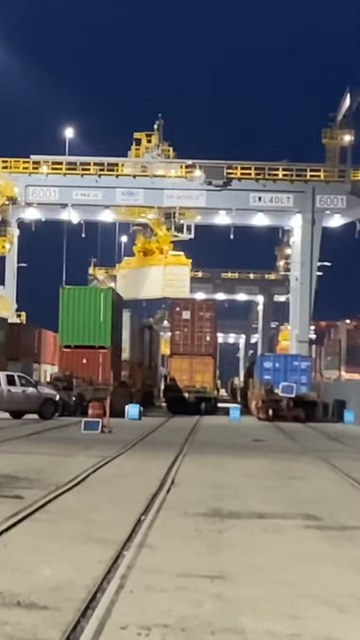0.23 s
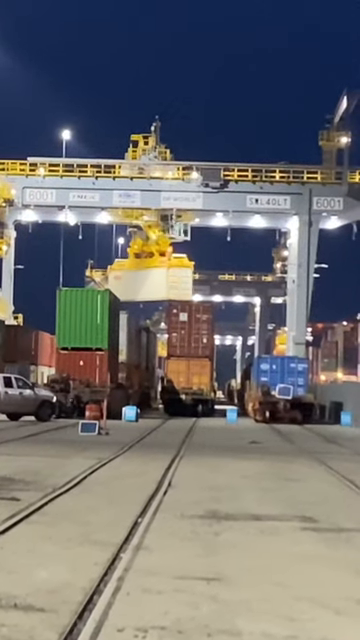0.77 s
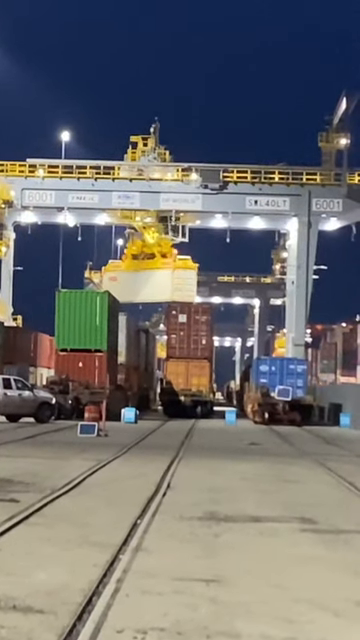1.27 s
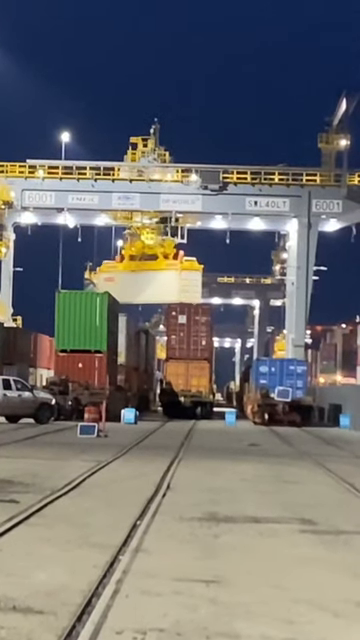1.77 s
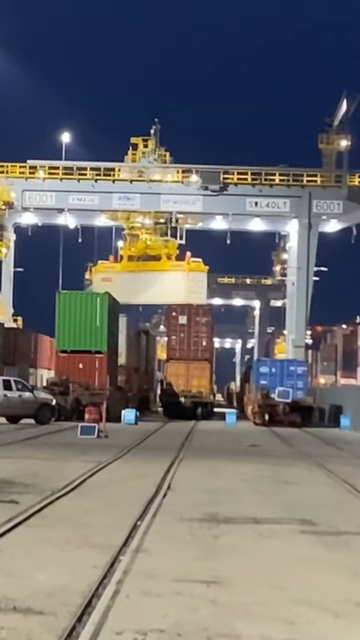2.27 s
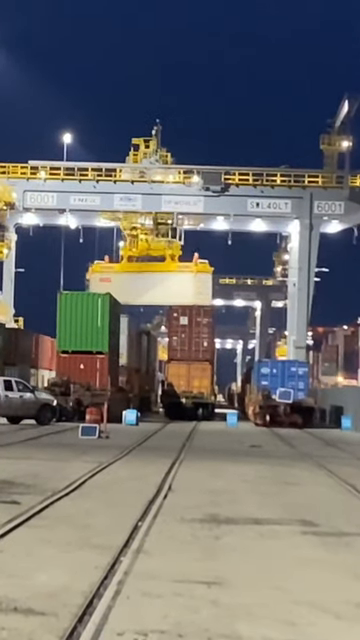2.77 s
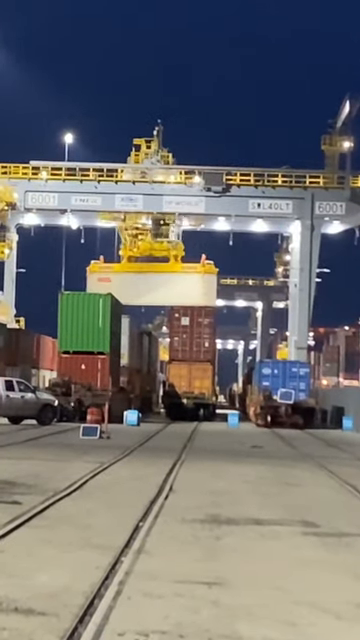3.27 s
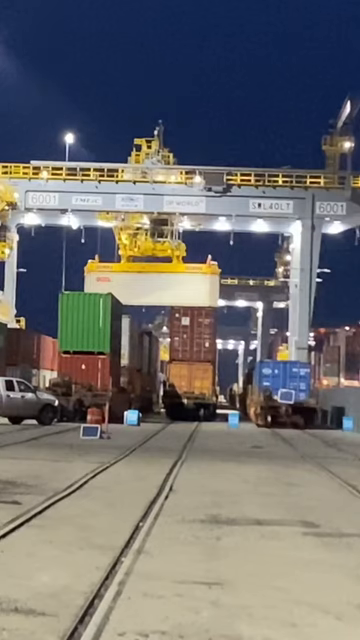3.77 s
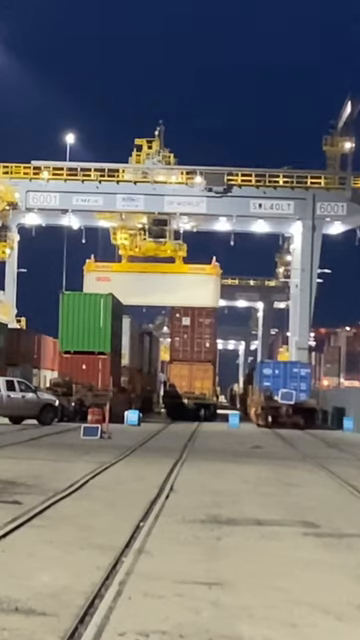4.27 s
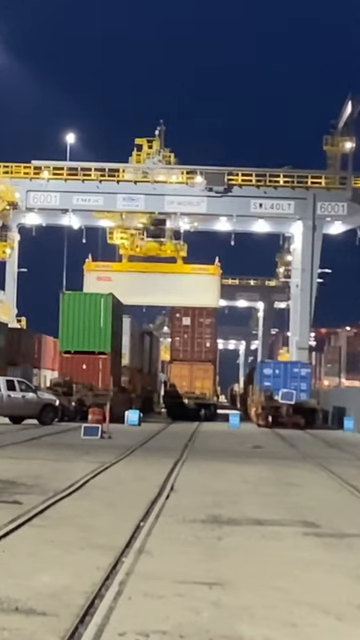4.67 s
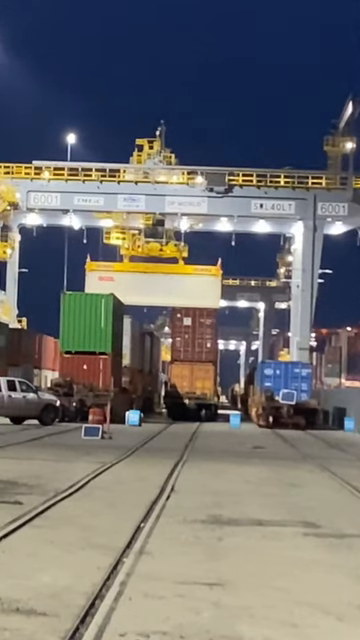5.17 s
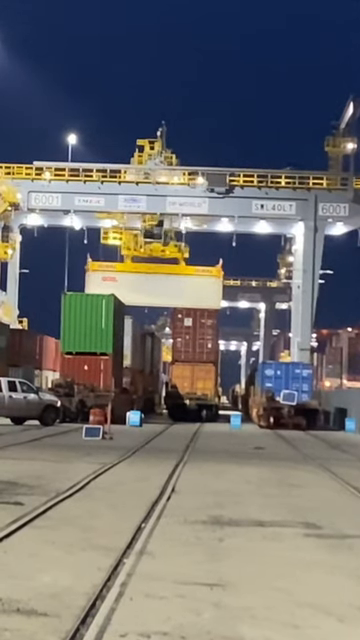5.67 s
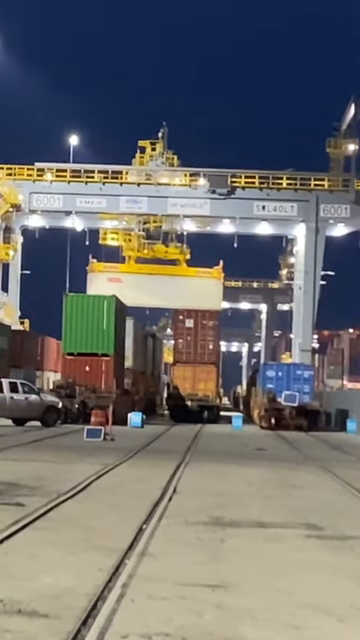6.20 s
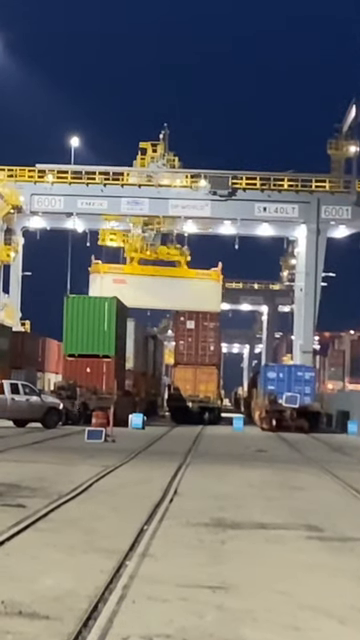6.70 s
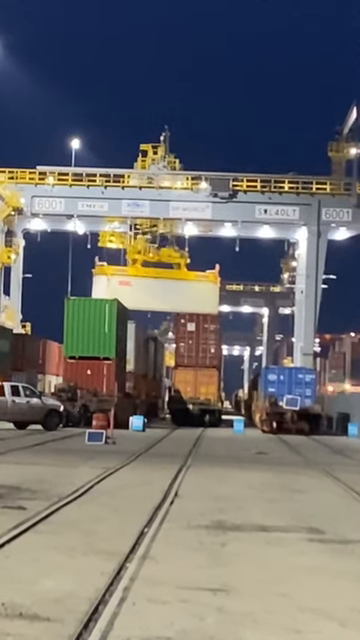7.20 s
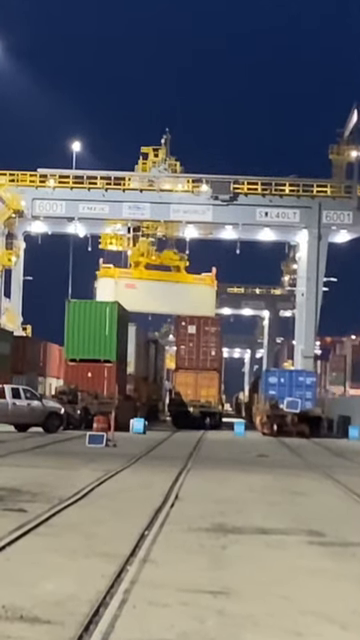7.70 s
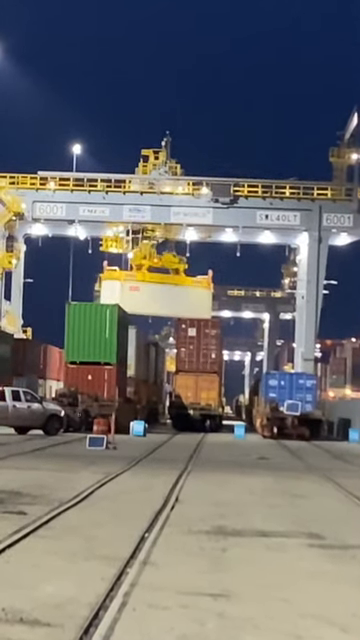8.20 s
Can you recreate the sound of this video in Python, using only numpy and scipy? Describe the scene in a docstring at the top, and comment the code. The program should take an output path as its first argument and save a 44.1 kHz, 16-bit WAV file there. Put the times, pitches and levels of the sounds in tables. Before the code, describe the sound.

A big diesel idles a little to the left at a rail terminal for the whole eight seconds or so. Its deep hum and fast, throaty bark, about 21 pulses a second, are the loudest sound, with a low rumble and a generator's thin whine. Ahead and slightly right, a gantry crane's motors whine and its gearbox whirrs, swelling briefly near 1.5 and 2.2 seconds. Steel wheels give faint, scratchy chirps from about 1.5 to 7.6 seconds, clearest near 5.8. A faint, thin, very high squeal runs through the first two seconds, and two more come near 5 and 7 seconds. Two soft, lower squeals sound around 4 and 7 seconds. Behind it all, cooling fans and the yard make a steady, airy rush.

```python
"""A deep hum and a throaty bark, 21 times a second: a big diesel idles to the left at a rail terminal.
Both are exhaust pulses shaped by the stack and silencer; a generator whines over them.
A gantry crane carries a container: its motors whine, its gearbox whirrs, and steel wheels on rail
give faint chirps, two soft squeals and three thin, very high ones.
Behind it all, cooling fans and the yard make a steady rush."""
import sys
import numpy as np
from scipy import signal
from scipy.fft import rfft, irfft, next_fast_len
from scipy.io import wavfile
from scipy.ndimage import uniform_filter1d, map_coordinates

SR = 44100
rng = np.random.default_rng(int(sys.argv[2]) if len(sys.argv) > 2 else 0)


def to_wav(s):
    """Save 16-bit WAV."""
    ch = np.atleast_2d(s).T  # columns
    pcm = np.round(np.clip(ch, -1, 1) * 32767)  # PCM
    wavfile.write(sys.argv[1], SR, pcm.astype(np.int16))


N = 372644


def amp(db):
    """Decibels to gain."""
    return 10 ** (np.asarray(db) / 20)


def unit(x):
    """Scale to rms 1."""
    return x / np.sqrt(np.mean(x ** 2) + 1e-20)


def curve_at(points, hz):
    """Read a breakpoint curve on a log frequency axis."""
    freqs, values = np.transpose(points)
    return np.interp(np.log(hz + 1), np.log(freqs), values)


def wobble(rate):
    """A smooth random modulator, rate knots a second."""
    knots = rng.standard_normal(int(N * rate / SR) + 4)
    return map_coordinates(knots, [np.arange(N) * rate / SR])


def filtered(x, response):
    """EQ x with a complex gain, given as a function of Hz."""
    size = next_fast_len(N + SR // 2)
    return irfft(rfft(x, size) * response(np.fft.rfftfreq(size, 1 / SR)), size)[..., :N]


def noise_bed(eq, correlation, patchy_db):
    """Stereo noise of rms 1 whose level varies in small patches of time and frequency."""
    spectra = signal.stft(rng.standard_normal((2, N)), nperseg=512)[2]
    patches = uniform_filter1d(rng.standard_normal(spectra.shape[1:]), size=6, axis=0)
    patches = uniform_filter1d(patches, size=16, axis=1)
    pair = signal.istft(spectra * amp(patchy_db * unit(patches)), nperseg=512)[1][:, :N]

    def mid_side_gains(hz):
        width = np.arccos(np.clip(curve_at(correlation, hz), -1, 1)) / 2
        return amp(curve_at(eq, hz)) * [np.cos(width), np.sin(width)]

    mid, side = filtered(pair, mid_side_gains)
    return unit(np.array([mid + side, mid - side]))


def tone(turns, fading, rate):
    """A tone of rms 1 on a phase in turns; scattered paths make a share of it fade in and out."""
    paths = 1 + fading * (wobble(rate) + 1j * wobble(rate))
    return unit(np.real(paths * np.exp(2j * np.pi * turns)))


def ringing(modes, grip_db, rate):
    """Steel grips and slips unevenly and excites its resonances; rms 1."""
    def body(f):
        return sum((-1) ** k * amp(db) * 1j * f * width / (hz * hz - f * f + 1j * f * width)
                   for k, (hz, width, db) in enumerate(modes))

    friction = amp(grip_db * wobble(rate)) * rng.standard_normal(N)
    return unit(filtered(friction, body))


def from_right(x, right_db, lead_ms):
    """Pan by level and arrival time; positive values favour the right ear, the crane's side."""
    right = lambda hz: amp(right_db / 2) * np.exp(1j * np.pi * hz * lead_ms / 1000)
    return filtered(x, lambda hz: np.array([1 / right(hz), right(hz)]))


# Pan of the engine side: f/Hz, left minus right level/dB
ENGINE_PAN = [(40, 1.7), (85, 1), (160, 1.9), (330, 1.7), (450, 5), (600, 6.3), (900, 6.5), (1200, 1.5),
              (1800, -1.5)]
def from_left(x, lead_ms):
    """The engine side reaches the left ear earlier and, in the lows and mids, louder."""
    left = lambda hz: amp(curve_at(ENGINE_PAN, hz) / 2) * np.exp(1j * np.pi * hz * lead_ms / 1000)
    return filtered(x, lambda hz: np.array([left(hz), 1 / left(hz)]))


def container_echoes(x, ripple_db, spacing_hz):
    """Echoes between steel containers colour a steady sound with fine peaks and dips."""
    knots = rng.standard_normal(SR // 4)
    ripple = lambda hz: amp(ripple_db * map_coordinates(knots, [hz / spacing_hz], mode="mirror"))
    return unit(filtered(x, ripple))


# Airy EQ of the fan bed: f/Hz, relative level/dB
FAN_EQ = [(300, -3.5), (800, 1), (1250, 2.5), (1700, 2.5), (2300, 1), (2900, -4.5), (4600, -8), (5300, -10),
          (6200, -16), (7300, -14.5), (8300, -29), (9300, -66)]
# Its stereo image: f/Hz, left-right correlation
FAN_IMAGE = [(800, 0.94), (1200, -0.2), (1700, 0.3), (2150, 0.95), (2800, .92), (3300, 1)]
def fans():
    """Cooling air hisses all over the yard and rings faintly between the containers."""
    air = noise_bed(FAN_EQ, FAN_IMAGE, patchy_db=0.86)
    air = container_echoes(air, ripple_db=.7, spacing_hz=16)
    return amp(-42 + 0.17 * wobble(3.5)) * air


# Top-end sheen: f/Hz, relative level/dB
SIZZLE_EQ = [(7100, -60), (7600, -3), (8500, 0), (10000, .5), (11000, -3), (12000, -3), (13000, -5),
             (15700, -6)]
def sizzle():
    """A thin, very high hiss comes from the crane's side."""
    hiss = noise_bed(SIZZLE_EQ, correlation=[(10000, .92)], patchy_db=2.0)
    return amp(-56.5) * from_right(hiss, right_db=0, lead_ms=.27)


# Distant low drones: f/Hz, level/dB
DRONE_TONES = [(37.6, -45), (74.9, -44), (115.8, -44), (154.1, -49), (198.5, -45)]
def drones(t):
    """Low tones of distant machines beat against the exhaust hum."""
    return sum(amp(db) * tone(hz * t, fading=0.31, rate=2.1) for hz, db in DRONE_TONES)


# Dark EQ of the rumble bed: f/Hz, relative level/dB
ROAR_EQ = [(20, -62), (30, -30), (42, -14), (60, -3.5), (110, -2), (200, -4), (300, -7), (400, -8),
           (540, -17.5), (950, -21), (1150, -27.5), (1700, -26.5), (2600, -54), (4000, -120)]
# Its stereo image: f/Hz, left-right correlation
ROAR_IMAGE = [(100, 0.97), (300, 0.91), (600, 0.34), (1200, 0.83)]
def roar():
    """The engine casing and its radiator rumble without a beat."""
    return amp(-27.5) * noise_bed(ROAR_EQ, ROAR_IMAGE, patchy_db=1)


def squeal(t, cue, spread_hz, flutter_rate):
    """Steel running on steel sings in a narrow, unsteady band: it swells, holds and dies away."""
    start, rise, hold, fall, hz, db = cue
    ramp_db, flutter_db = 18.5, 1.5  # ramp_db is covered in one rise or fall time
    fade = np.maximum((start + rise - t) / rise, 0) + np.maximum((t - start - rise - hold) / fall, 0)
    level = amp(db - ramp_db * fade + flutter_db * wobble(flutter_rate))
    return level * np.array([tone(hz * t, fading=2.4, rate=spread_hz) for _ in range(2)])


# Squeal cues, thin and soft: start t/s, rise/s, hold/s, fall/s, f/Hz, held level/dB
THIN_SQUEALS = [(-.1, .2, 1.65, .3, 14380, -66.5), (4.45, .47, .11, .4, 14150, -58.5),
                (6.62, .09, .3, .14, 14228, -55.5)]
SOFT_SQUEALS = [(3.6, .35, .27, .4, 5170, -64.5), (6.68, .2, .13, .27, 7105, -64.5)]
def squeals(t):
    """The crane's steel squeals: three very high and wide, two lower and dead centre."""
    wide = sum(squeal(t, cue, spread_hz=130, flutter_rate=20) for cue in THIN_SQUEALS)
    centre = sum(squeal(t, cue, spread_hz=85, flutter_rate=12)[0] for cue in SOFT_SQUEALS)
    return wide + centre


# Chirp cues: centre t/s, half-length/s, f/Hz, level before trim/dB
CHIRP_CUES = [(1.52, .05, 5400, -60), (1.69, .05, 5200, -61), (2.32, .04, 5650, -62),
              (2.74, .03, 5280, -59), (2.95, .03, 5350, -60), (3.33, .025, 5700, -59.5),
              (3.54, .04, 5750, -59.5), (3.95, .04, 5200, -62), (4.83, .05, 5350, -60),
              (5.24, .05, 5380, -61), (5.65, .04, 5300, -57.5), (5.825, .025, 5250, -55),
              (5.88, .028, 5250, -55.5), (6.28, .06, 5450, -61), (6.57, .04, 5350, -61),
              (6.88, .05, 5350, -60), (7.36, .04, 5200, -61), (7.49, .025, 5100, -60),
              (7.58, .04, 5150, -58)]
def flange_chirps(t, trim_db, spread_hz):
    """A wheel flange catches the rail: a short, scratchy ring swells and fades."""
    out = np.zeros(N)
    for centre, half_length, hz, db in CHIRP_CUES:
        near = abs(t - centre) < 2 * half_length
        offset = t[near] - centre
        knots = rng.standard_normal((2, SR // 100))
        position = (offset - offset[0]) * spread_hz
        real, imag = (map_coordinates(row, [position], mode="mirror") for row in knots)
        ring = unit(np.real((real + 1j * imag) * np.exp(2j * np.pi * hz * offset)))
        out[near] += amp(trim_db + db) * np.exp(-2 * (offset / half_length) ** 2) * ring
    return out


# Fader ride for the load on the trolley's drive: t/s, relative level/dB
DRIVE_EFFORT = [(0, -3), (1.3, -2), (1.55, 2.5), (3.2, -3), (5.2, -1), (5.8, 0.5), (8.4, -1)]
# Resonances of gearbox and wheels: f/Hz, bandwidth/Hz, relative level/dB
GEAR_MODES = [(1682, 15, 8), (1806, 40, 3.5), (2180, 100, 0.5), (2330, 120, -2)]
WHEEL_MODES = [(4420, 190, 5), (5170, 110, 1), (5380, 120, -5), (5860, 180, -1.5)]
def trolley(t, gear_db, wheel_db):
    """Gears whirr and wheels chirp as the load rolls along the girder; both follow the drive's effort."""
    effort_db = np.interp(t, *np.transpose(DRIVE_EFFORT))
    gears = amp(gear_db + effort_db + 1.5 * wobble(3.9)) * ringing(GEAR_MODES, grip_db=2.0, rate=18)
    # each wheel resonance flickers on its own
    rims = sum(amp(db) * ringing([(hz, width, db)], grip_db=3.5, rate=40)
               for hz, width, db in WHEEL_MODES)
    return gears + amp(wheel_db + effort_db + 1.4 * wobble(7.2)) * unit(rims)


# Groan cues: centre t/s, half-length/s, level/dB
GROAN_CUES = [(1.42, .06, -50), (1.55, .06, -46.5), (2.22, .07, -47)]
def gear_groans(t):
    """The gear teeth bite harder for a moment and the casing's two lowest resonances swell."""
    swell = sum(amp(db) * np.exp(-((t - centre) / half_length) ** 2)
                for centre, half_length, db in GROAN_CUES)
    return swell * ringing(GEAR_MODES[:2], grip_db=2, rate=40)


# Whines, the first two beating roughly: f/Hz, level/dB, right minus left level/dB, right lead/ms
MOTOR_WHINES = [(1445, -53.6, 2.7, .447), (1465.8, -49.4, 4.2, .456), (1540, -69, 0, 0),
                (1680, -63.5, -4, -.03), (1786, -67, 0, 0), (2072, -70, 0, 0), (2162, -64.5, 0, 0),
                (2930, -75, 0, 0)]
def crane_motors(t, drift_turns, fading, flicker_rate):
    """The crane's motors whine, each drifting a little in speed and flickering in the echoes."""
    whine = lambda hz: tone(hz * t + drift_turns * wobble(2.07), fading, flicker_rate)
    return sum(amp(db) * from_right(whine(hz), right_db, lead_ms)
               for hz, db, right_db, lead_ms in MOTOR_WHINES)


# Generator partials: multiple of the firing rate, level/dB
GENERATOR_PARTIALS = [(4, -39), (6, -52), (8, -52), (9, -55), (10, -52.7), (11, -52.7), (12, -56),
                      (14, -54.3), (16, -57.5), (20, -63)]
def generator(t, firing_hz):
    """A faster engine further off gives a stack of thin tones; echoes scramble their phases."""
    firings = firing_hz * t + 0.012 * wobble(1.475)
    return sum(amp(db) * tone(k * firings + rng.random(), fading=.22, rate=5)
               for k, db in GENERATOR_PARTIALS)


# Breathy low mids of the escaping gas: f/Hz, relative level/dB
RASP_EQ = [(100, -80.5), (200, -20), (280, 8), (420, 12), (560, -6), (900, -20), (1300, -37), (2500, -120)]
def exhaust_rasp(cycles, level_db, place, width):
    """Turbulent gas leaves the stack in one burst a cycle."""
    gate = np.exp((np.cos(2 * np.pi * (cycles - place)) - 1) / width)
    gas = filtered(rng.standard_normal(N), lambda hz: amp(curve_at(RASP_EQ, hz)))
    return amp(level_db) * unit(gate * gas)


# Buzzy edge of the stack: multiple of the cycle rate, level/dB
BUZZ_PARTIALS = [(21, -48), (23, -53), (25, -57.5), (28, -60), (29, -58), (31, -61.5), (33, -61.5),
                 (36, -61.5), (39, -63), (42.5, -61), (43, -60), (43.5, -60.5), (44.5, -60), (45.5, -59.5)]
def exhaust_buzz(cycles):
    """Faint high orders of the exhaust give a buzz; echoes scramble their phases."""
    return sum(amp(db) * tone(k * cycles + rng.random(), fading=0.21, rate=2.99)
               for k, db in BUZZ_PARTIALS)


# Low-end weight of the exhaust: multiple of the cycle rate, relative level/dB
HUM_PARTIALS = [(2, -4.2), (3, -21), (4, -18.2), (5, -19.6), (6, -5.3), (7, -25), (8, 1.1), (9, -10.6),
                (10, -9.4)]
def exhaust_hum(cycles, level_db):
    """The low orders of the exhaust pulses; the silencer delays higher ones more, smoothing the pulse."""
    lead_cycles, smear_turns = .07, .146
    hum = sum(amp(db) * tone(k * (cycles + lead_cycles) - smear_turns * k ** 2, fading=.05, rate=4)
              for k, db in HUM_PARTIALS)
    return amp(level_db) * unit(hum)


# One cycle's uneven puffs: place/cycles, level before trim and EQ/dB, final f/Hz, swell/s,
# then for odd cycles: level change/dB, delay/cycles
PUFF_PATTERN = [(-.048, -13.4, 305, .0101, -.5, -.003), (.177, -25, 180, .0024, 8, -.012),
                (.478, -21, 290, .0081, -1, -.007), (.737, -28.6, 219, .0081, 1, .038)]
# The silencer's roll-off: f/Hz, level/dB
SILENCER_EQ = [(480, 0), (560, -3), (680, -8), (1200, -16)]
def exhaust_bark(cycles, trim_db, scatter_db, jitter_s):
    """Each puff swells in the stack and sags in pitch; odd cycles flip sign and shift size and timing."""
    t = np.arange(SR // 25) / SR
    pitch_sag = 1 + .8 * np.exp(-t / .0055)
    steepness = 8.8
    beats = np.arange(int(cycles[-1]) + 1)
    odd = beats % 2
    out = np.zeros(N)
    for place, db, hz, swell, odd_db, odd_delay in PUFF_PATTERN:
        jitter, scatter = rng.standard_normal((len(beats), 2)).T
        onsets = np.searchsorted(cycles, beats + place + odd * odd_delay) + jitter_s * SR * jitter
        sizes = (-1) ** beats * amp(trim_db + db + odd * odd_db + scatter_db * scatter)
        triggers = np.bincount(np.clip(onsets, 0, N).astype(int), sizes, N + 1)[:N]
        envelope = (t / swell * np.exp(1 - t / swell)) ** steepness
        puff = envelope * np.sin(2 * np.pi * np.cumsum(hz * pitch_sag) / SR)
        out += signal.fftconvolve(triggers, puff)[:N]
    return filtered(out, lambda hz: amp(curve_at(SILENCER_EQ, hz)))


def diesel(t, cycle_hz, first_beat_s):
    """A governed engine that hunts slightly: hum, bark, buzz and rasp all follow one shaft."""
    cycles = cycle_hz * (t - first_beat_s) + .002 * wobble(1.3)
    hum = exhaust_hum(cycles, level_db=-22.0)
    bark = exhaust_bark(cycles, trim_db=0.6, scatter_db=0.1, jitter_s=.00002)
    buzz = exhaust_buzz(cycles)
    rasp = exhaust_rasp(cycles, level_db=-44.5, place=0.1, width=0.19)
    return hum + bark + buzz + rasp


def scene():
    """The mix: engines to the left, the crane and the yard ahead."""
    t = np.arange(N) / SR
    engines = from_left(diesel(t, cycle_hz=21.2448, first_beat_s=.0147) + drones(t), lead_ms=0.33)
    engines += from_left(roar() + generator(t, firing_hz=72.12), lead_ms=0.26)
    crane = crane_motors(t, drift_turns=0.16, fading=0.12, flicker_rate=17)
    crane += trolley(t, gear_db=-54.5, wheel_db=-62.0) + gear_groans(t)
    crane += flange_chirps(t, trim_db=3.0, spread_hz=400) + squeals(t)
    return engines + crane + fans() + sizzle()


def record(dry):
    """A brick-wall low-pass on the master."""
    cutoff_hz = 15780
    return filtered(dry, lambda hz: hz < cutoff_hz)


dry = scene()
out = record(dry)
to_wav(out)
```